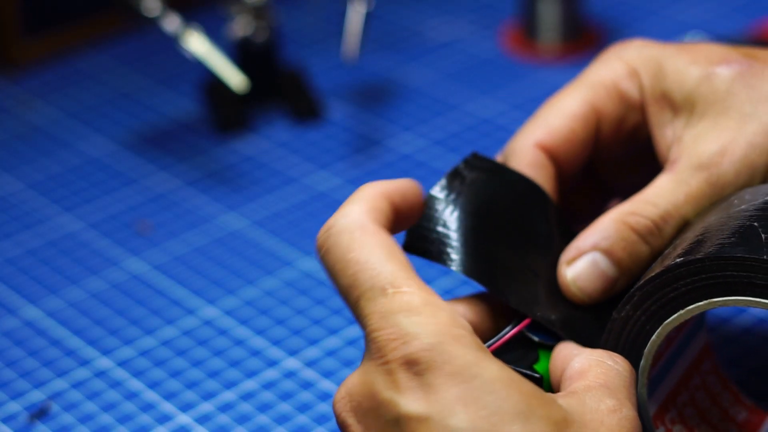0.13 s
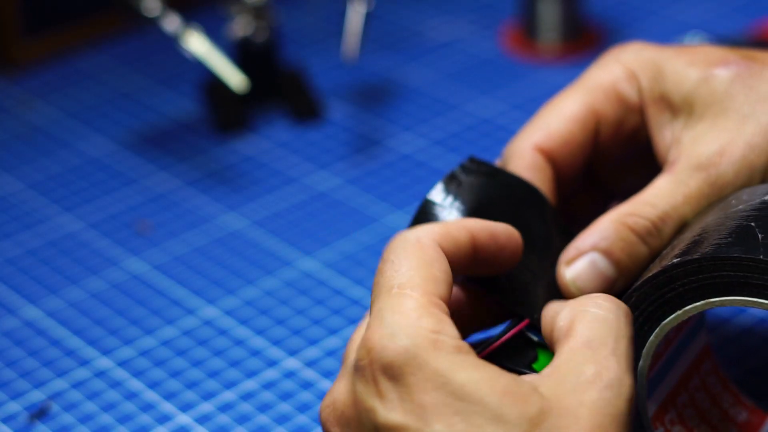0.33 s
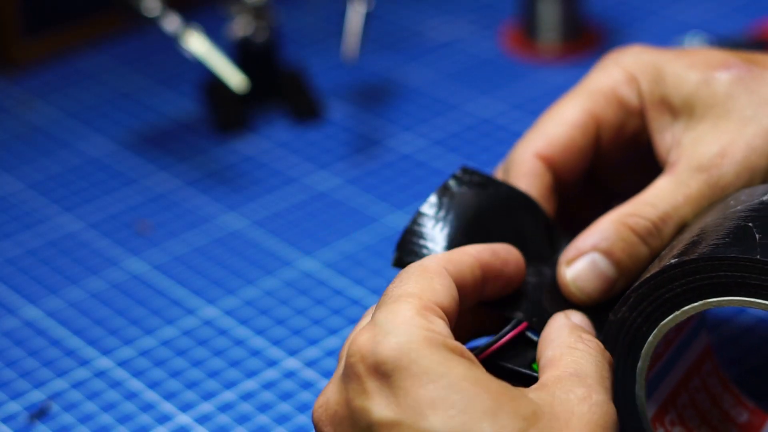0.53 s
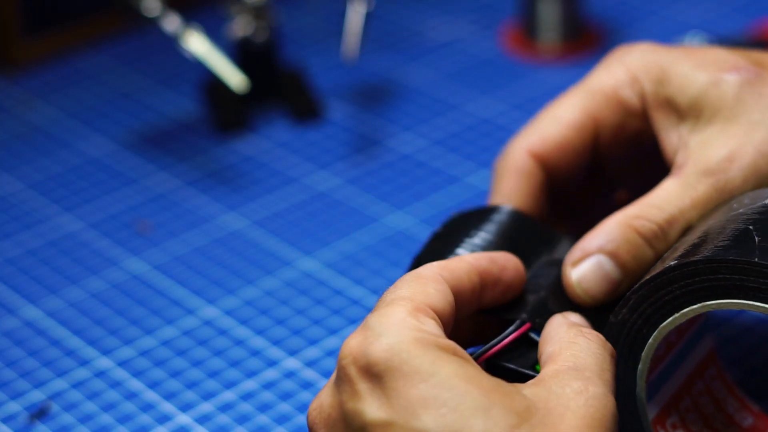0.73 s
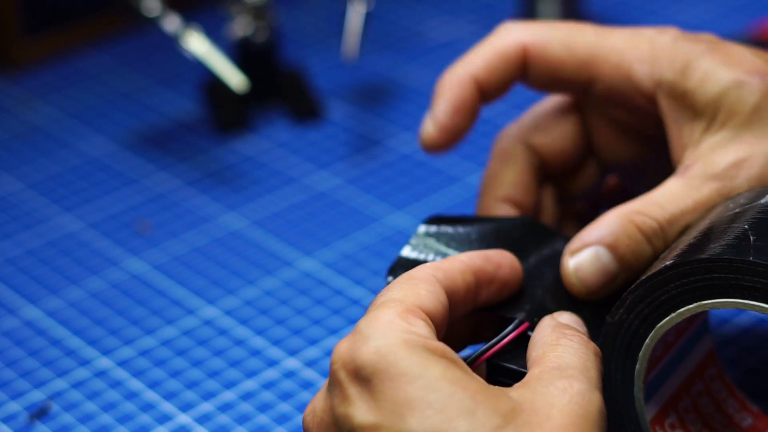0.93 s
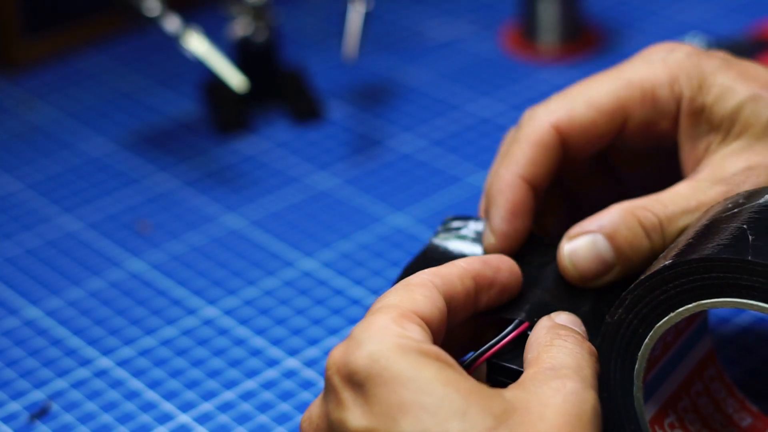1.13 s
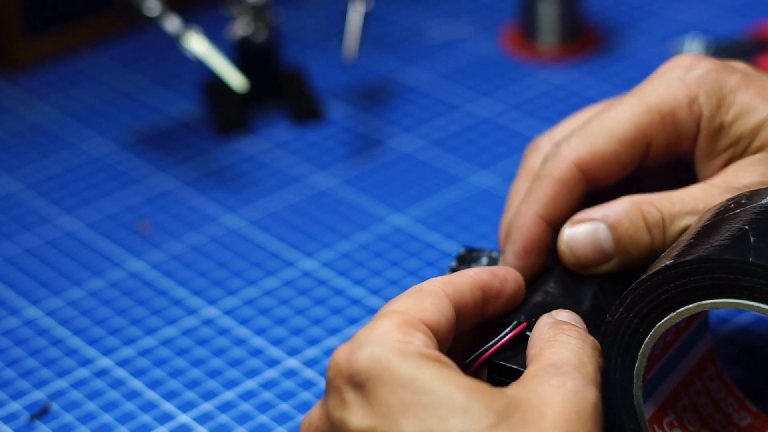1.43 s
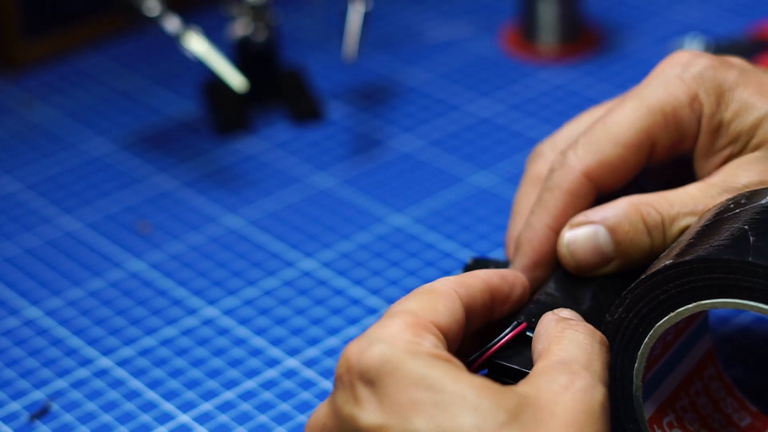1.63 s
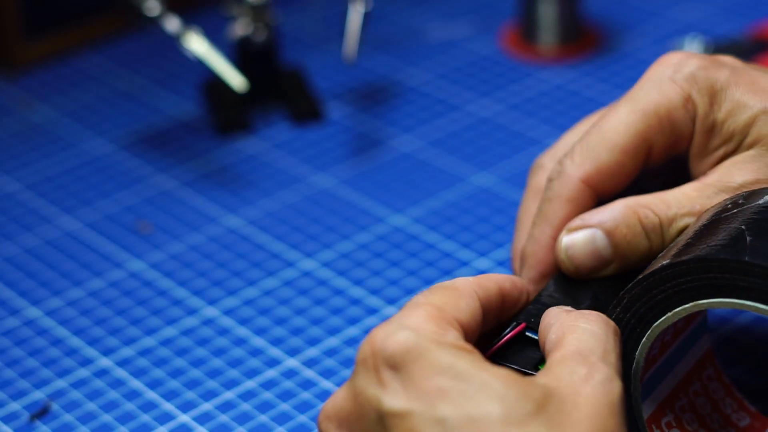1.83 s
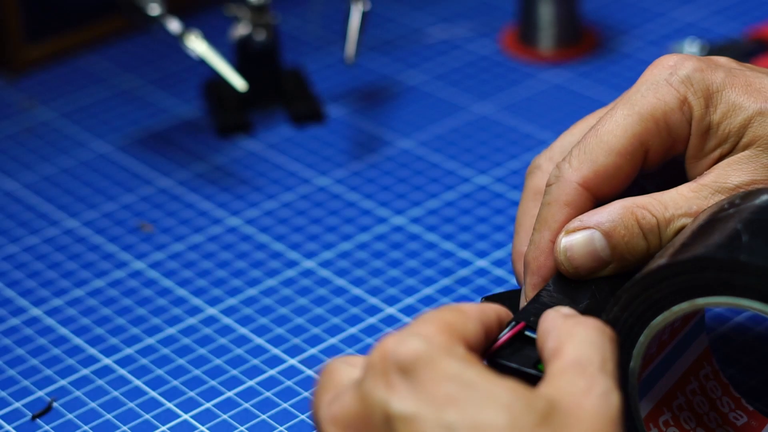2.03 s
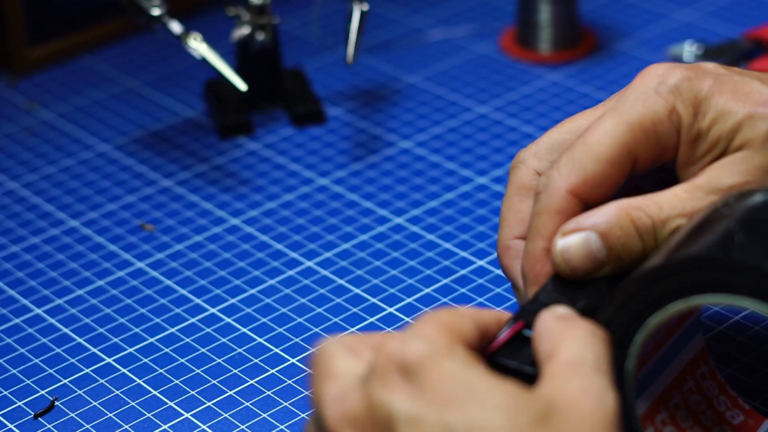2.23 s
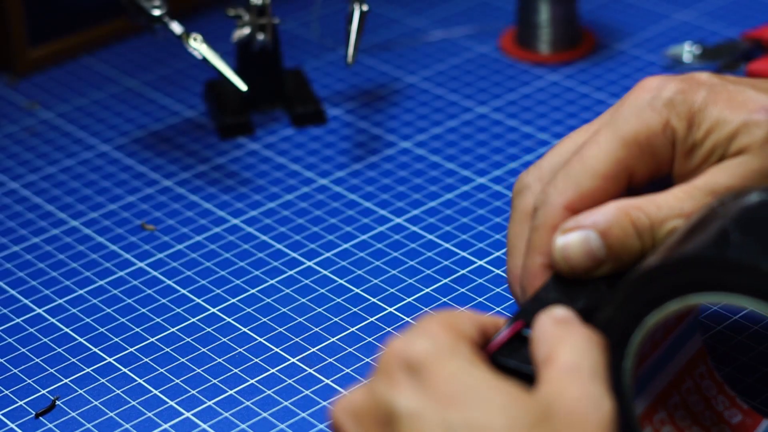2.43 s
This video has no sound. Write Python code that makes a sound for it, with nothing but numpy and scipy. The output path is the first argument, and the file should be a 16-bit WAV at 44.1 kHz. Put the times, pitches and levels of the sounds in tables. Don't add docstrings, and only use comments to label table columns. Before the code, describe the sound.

Stiff sticky tape being wrapped by hand, with bright snaps, small knocks and a low room rumble

```python
import sys
import numpy as np
from scipy import signal
from scipy.fft import rfft, irfft
from scipy.io import wavfile
from scipy.ndimage import uniform_filter1d

SR = 44100
rng = np.random.default_rng(int(sys.argv[2]) if len(sys.argv) > 2 else 0)


def gain_from_db(level_db):
    decades = np.asarray(level_db, float) / 20
    return 10 ** decades


def transcribe(u):
    v = np.clip(np.atleast_2d(u).T, -1, 1)
    q = np.round(v * 32767).astype(np.int16)
    wavfile.write(sys.argv[1], SR, q)


N = 114660

# [Hz, sheet]
SHARP_SNAPS = [(0.0595, -29, -27, 3780), (0.0818, -19.5, -15, 7700), (0.192, -23.5, -39, 5840),
               (0.2142, -26, -8, 3690), (0.2228, -18.5, -10, 6100), (0.2624, -28.5, -21, 3000),
               (0.3186, -22, -10, 3540), (0.3574, -28.5, -10.5, 3000), (0.3815, -21, -19, 3280),
               (0.449, -33, -18, 8600), (0.4613, -31, -25, 7960), (0.493, -19, -11.5, 8050),
               (0.5275, -24, -5.5, 7700), (0.5387, -12, -15.5, 7540), (0.562, -19, -48, 6600),
               (0.7475, -18, -21, 4500), (0.7703, -11, -8, 7900), (0.7965, -3.5, -11.5, 6150),
               (0.852, -14.5, -6.5, 5800), (0.9303, -43.5, 12, 6000), (0.9521, -20, -7, 7050),
               (1.345, -17.5, -12.5, 7000), (1.4633, -14, -18, 4560), (1.5427, -21, -11, 5960),
               (1.866, -19, -10, 3300), (1.9823, -17, -11, 2930), (2.054, -2.5, -13.5, 7400),
               (2.2556, -15.5, -18, 8800), (2.4236, -19, -19, 4500), (0.0237, -41, -22, 3240),
               (.417, -33, -7, 4000), (0.621, -25.5, -16, 4650), (0.656, -22.5, -12, 4800),
               (0.6996, -22, -18, 2900), (0.7122, -23.5, -9, 4900), (0.7272, -23, -10, 3000),
               (0.7794, -15, -11.5, 7000), (0.7844, -1.5, -20, 7900), (.7885, -9, -30.5, 6540),
               (0.7944, -14, -7.5, 6000), (1.3031, -29, -7, 3970), (2.008, -21, -10, 4500),
               (2.2054, -32, -16, 4850), (2.4038, -27, -15, 5300), (2.4175, -25, -9, 3360),
               (2.4343, -23, -15, 4470), (1.8882, -23, -6, 3500), (1.9214, -35, -9, 4570)]


def snaps():
    out, t = np.zeros(N), np.arange(3000) / SR
    crack_s, tail_s, tail_db = .0007, .005, -9.5
    air_per_db = .35
    for start_s, level_db, body_db, pitch_hz in SHARP_SNAPS:
        ragged = gain_from_db(1.0 * np.repeat(rng.standard_normal(100), 30))
        crack = np.exp(-t / crack_s)
        tail = gain_from_db(tail_db) * ragged * np.exp(-t / tail_s)
        burst = rng.standard_normal(len(t)) * (crack + tail)
        top = sheet(burst, pitch_hz, air_per_db * level_db)
        low = body(burst)
        snap = top / abs(top).max() + gain_from_db(body_db + 3.5) * low / abs(low).max()
        add(out, start_s, gain_from_db(level_db) * snap)
    return out


# start_s [s], length_s [s], sheet_db [dB], pitch_hz [Hz, sheet], body_db [dB]
TAPE_STROKES = [(0, 0.027, -44.5, 3920, -44.5), (0.111, 0.036, -45, 7100, -42),
                (0.165, 0.087, -47.5, 5660, -52), (0.375, 0.056, -49, 7800, -89),
                (0.445, 0.16, -42.5, 6400, -47), (0.525, 0.037, -40, 7000, -59),
                (0.63, 0.062, -48, 5000, -53.5), (0.701, 0.0078, -42, 3800, -59),
                (0.712, 0.082, -36.5, 5950, -40), (0.794, 0.12, -42, 6000, -44),
                (1.054, 0.09, -44.5, 5000, -44), (1.168, 0.094, -51.5, 5000, -59),
                (1.302, 0.0066, -62, 4100, -30), (1.704, 0.013, -42, 5000, -45),
                (1.873, 0.062, -46.5, 6100, -52), (1.985, 0.02, -39, 4000, -49),
                (2.001, 0.059, -37, 5000, -44), (2.066, 0.035, -36.5, 6200, -39.5),
                (2.106, 0.13, -41, 5850, -46.5), (2.206, 0.012, -39, 5000, -60),
                (2.402, 0.012, -41.5, 5400, -49), (2.42, 0.029, -43, 5000, -53),
                (2.564, 0.019, -43.5, 6050, -45.5),
                (1.772, .012, -45, 6700, -58), (1.886, .010, -45, 4600, -52), (1.921, .012, -43, 4600, -50),
                (1.465, .018, -44, 4800, -54), (2.255, .009, -35, 8800, -54), (.586, .006, -49, 12500, -62),
                (.144, .012, -47, 13000, -62), (.165, .02, -49, 13000, -55), (.251, .005, -50, 13000, -62),
                (2.055, .009, -28, 7500, -40), (1.305, .02, -47, 4500, -46), (.450, .02, -48, 13000, -60),
                (2.265, .012, -43, 9000, -60), (.120, .02, -49, 13500, -62), (.7805, .019, -24, 7100, -21)]


def strokes():
    out, t = np.zeros(N), np.arange(N) / SR
    grains_per_s, grain_s, spread_db = 5000, .0005, 3.5
    attack_share, release_share = .1, .3
    sizes = gain_from_db(spread_db * np.minimum(rng.exponential(size=N), 3))
    grains = (rng.random(N) < grains_per_s / SR) * sizes
    smear = signal.lfilter([1], [1, -np.exp(-1 / (grain_s * SR))], grains)
    crackle = smear * rng.standard_normal(N) * gain_from_db(1.6 * walk(70))
    for start_s, length_s, sheet_db, pitch_hz, body_db in TAPE_STROKES:
        i = int(max(start_s, 0) * SR)
        x = crackle[i:i + int((length_s * 2 + .01) * SR)]
        u = t[:len(x)] / length_s
        attack = np.minimum(u / attack_share, 1)
        release = np.exp(-np.maximum(u - 1, 0) / release_share)
        colour = gain_from_db(sheet_db) * sheet(x, pitch_hz) + gain_from_db(body_db) * body(x)
        add(out, start_s, attack * release * colour)
    return out


# centre_hz [Hz], width_hz [Hz], level_db [dB]
TAPE_MODES = [(3300, 1900, 0), (5000, 2000, -2), (8200, 2400, -3)]


def sheet(x, hz, extra_air_db=0):
    f = np.arange(1, len(x) // 2 + 2) * SR / len(x)
    sheet_q, modes_db, air_db = 1.83, -1, -4
    air_from_hz, air_top_hz = 5000, 12000

    def peak(centre, width):
        return 1 / (1 + ((f - centre ** 2 / f) / width) ** 2)

    modes = np.sqrt(sum((gain_from_db(db) * peak(c, w)) ** 2 for c, w, db in TAPE_MODES))
    air = 1 / np.sqrt((1 + (air_from_hz / f) ** 4) * (1 + (f / air_top_hz) ** 2))
    power = unit(peak(hz, hz / sheet_q)) ** 2
    power = power + (gain_from_db(modes_db) * unit(modes)) ** 2
    power = power + (gain_from_db(air_db + extra_air_db) * unit(air)) ** 2
    return unit(irfft(rfft(x) * np.sqrt(power), len(x)))


def body(x):
    wall = resonate_twice(x, 1656, 1640)
    hollow = resonate_twice(x, 714, 2130)
    return unit(unit(wall) + gain_from_db(6.5 - 1.0) * unit(hollow))


# [s, ring]
PACK_KNOCKS = [(0.021, -25, 890, 0.018), (0.124, -18.5, 287, 0.093), (.134, -23.5, 449, 0.09),
               (0.135, -19, 1980, 0.017), (.22, -42, 750, 0.014), (0.707, -35, 500, 0.033),
               (.678, -27.5, 470, 0.031), (.783, -17.5, 784, 0.057), (0.7956, -6.5, 1710, 0.04),
               (1.304, -20.5, 950, 0.015), (1.308, -27.5, 324, 0.12), (1.355, -26.5, 925, 0.019),
               (1.557, -22.5, 930, 0.015), (1.583, -26, 1360, 0.011), (1.991, -12.5, 626, 0.02),
               (1.99, -13.5, 973, 0.018), (2.009, -20, 630, 0.031), (2.009, -19, 272, 0.11),
               (2.056, -21.5, 504, 0.075), (2.14, -31.5, 880, 0.12), (2.181, -22.5, 846, 0.053),
               (2.206, -22, 894, 0.056), (2.229, -34.5, 922, 0.12), (2.405, -30, 596, 0.024),
               (2.423, -21.5, 410, 0.069), (2.424, -21, 2006, 0.033), (2.433, -22, 327, 0.12),
               (2.434, -32, 2050, 0.055), (.738, -22, 900, 0.019), (.708, -23, 940, 0.014),
               (2.572, -20, 400, 0.033)]


def knocks():
    out, t = np.zeros(N), np.arange(6000) / SR
    grit_db, grit_q = -1, 3
    for start_s, level_db, pitch_hz, t60_s in PACK_KNOCKS:
        grit = unit(band(rng.standard_normal(len(t)), pitch_hz, pitch_hz / grit_q))
        ring = np.sin(2 * np.pi * pitch_hz * t) + gain_from_db(grit_db) * grit
        onset = np.minimum(t * pitch_hz * 2, 1)
        decay = np.exp(-np.log(1000) * t / t60_s)
        add(out, start_s, gain_from_db(level_db - 8.0) * ring * onset * decay)
    return out


# centre_s [s], level_db [dB peak], pitch_hz [Hz]
BENCH_THUMPS = [
    (1.999, -17, 100),
    (2.011, -17, 130),
    (2.040, -10, 45),
    (2.072, -9, 65),
    (2.110, -6, 33),
    (2.30, -16, 25),
]


def thumps():
    out, t = np.zeros(N), np.arange(6000) / SR
    middle_s = t[-1] / 2
    for centre_s, level_db, pitch_hz in BENCH_THUMPS:
        u = (np.pi * pitch_hz * (t - middle_s)) ** 2
        add(out, centre_s - middle_s, gain_from_db(level_db) * (2 * u - 1) * np.exp(-u))
    return out


# [dB, tick peak]
TICK_LEVELS = [(0, -33), (.25, -45), (.45, -39.5), (1.0, -35), (1.3, -39.5), (1.65, -32), (1.9, -31.5),
               (2.0, -36), (2.25, -41), (2.42, -41), (2.46, -33.5), (2.6, -32.5)]
CYCLE_LAGS = [0, .004, .010, .016]
CYCLE_ODDS = [.85, .6, .15, .12]


def buzz():
    mains_hz, first_tick_s, spread_db = 50, .0172, 6
    chance = rng.random((int(N / SR * mains_hz), len(CYCLE_ODDS), 2))
    times = first_tick_s + np.arange(len(chance))[:, None] / mains_hz + np.array(CYCLE_LAGS)
    level_db = np.interp(times, *np.array(TICK_LEVELS).T) - spread_db * chance[..., 1]
    sizes = (chance[..., 0] < np.array(CYCLE_ODDS)) * gain_from_db(level_db)
    pulses = np.zeros(N)
    np.add.at(pulses, np.minimum((times * SR).astype(int), N - 1), sizes)
    click = np.zeros(400)
    click[0] = 1
    tick = np.zeros(400)
    for hz, width_hz, db in ((3220, 1090, 0), (5000, 2000, -2.5), (7780, 2000, -5)):
        ring = resonate_twice(click, hz, width_hz)
        tick += gain_from_db(db) * ring / abs(ring).max()
    return signal.fftconvolve(pulses, tick)[:N]


# time_s [s], rumble_db [dB], tilt_db [dB per octave]
BENCH_LOAD = [(0.0, -1, 4.5), (0.079, -22.5, -7), (0.19, -31, 3), (0.27, -22, -1), (0.49, -26, -1.5),
              (.72, -29, -2.5), (.95, -21.5, 0), (1.23, -23.5, -1), (1.33, -29.5, 1.5), (1.49, -22.5, -1),
              (1.54, -26.5, 0.5), (1.86, -21.5, 0), (1.97, -26.5, -7.5), (1.999, -24, 5.5),
              (2.11, -22.5, 2.5), (2.16, -25, 0), (2.29, -21.5, -5), (2.36, -22.5, -1.5),
              (2.45, -23.5, 3.5), (2.6, -23.5, -0.5)]
# centre_hz [Hz], width_hz [Hz], level_db [dB]
ROOM_RUMBLE = [(21.93, 11, -1.5), (53.1, 8.2, -2), (71.5, 25, -3), (96.1, 25.4, -9.5), (135, 84, -13),
               (229.6, 100, -20.5)]


def rumble():
    time_s, rumble_db, tilt_db = np.array(BENCH_LOAD).T
    t = np.arange(N) / SR
    load = np.minimum(np.interp(t, time_s, rumble_db), -21)
    tilt = np.interp(t, time_s, tilt_db)
    low = np.zeros(N)
    for hz, width_hz, db in ROOM_RUMBLE:
        swell = gain_from_db(db + tilt * np.log2(hz / 40) + 1.2 * walk(4.28))
        low += swell * unit(resonate_twice(rng.standard_normal(N), hz, width_hz))
    return unit(low) * gain_from_db(load)


# pitch_hz [Hz], level_db [dB per Hz]
HISS_COLOUR = [(150, -5), (300, 1.5), (500, -4.5), (1000, -5.5), (2300, -14.5), (5000, -15), (9000, -20),
               (16000, -61)]


def hiss():
    room_db, flicker_db, mic_db = -49, 1.3, -56.5
    hz = np.maximum(np.arange(N // 2 + 1) * SR / N, 1)
    pitch_hz, level_db = np.array(HISS_COLOUR).T
    colour = gain_from_db(np.interp(np.log(hz), np.log(pitch_hz), level_db)) * (hz > 120)
    air = unit(irfft(rfft(rng.standard_normal(N)) * colour, N))
    return gain_from_db(room_db + flicker_db * walk(17)) * air + gain_from_db(mic_db) * rng.standard_normal(N)


def unit(x):
    return x / np.sqrt(np.mean(x ** 2) + 1e-18)


def band(x, hz, width_hz):
    return signal.lfilter(*signal.iirpeak(hz, hz / width_hz, fs=SR), x)


def resonate_twice(x, hz, width_hz):
    return band(band(x, hz, width_hz), hz, width_hz)


def add(out, start_s, x):
    i = int(max(start_s, 0) * SR)
    out[i:i + len(x)] += x[:max(N - i, 0)]


def walk(rate):
    k = int(SR / rate)
    steps = np.repeat(rng.standard_normal(N // k + 1), k)
    return unit(uniform_filter1d(steps, k)[:N])


def scene():
    near = snaps() + strokes() + buzz()
    floor = knocks() + thumps() + rumble() + hiss()
    t = np.arange(int(.3 * SR)) / SR
    room_t60_s, wet_db = 0.21, -17
    tail = rng.standard_normal(len(t)) * np.exp(-np.log(1000) * t / room_t60_s)
    tail = tail * (t > .003)
    wet = signal.fftconvolve(near, tail / np.sqrt(np.sum(tail ** 2)))[:N]
    return (near + gain_from_db(wet_db) * wet + floor)[None]


def low_pass(x):
    return signal.sosfilt(signal.butter(12, 16830, fs=SR, output="sos"), x)


def record(dry):
    top_cut = signal.ellip(6, .2, 30, 15800, fs=SR, output="sos")
    mix = signal.sosfilt(top_cut, dry)
    return low_pass(mix)


dry = scene()
out = record(dry)
transcribe(out)
```